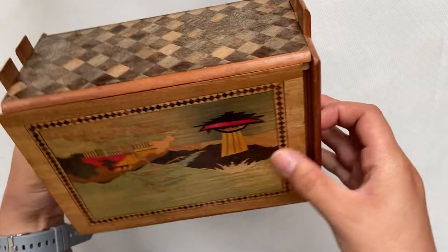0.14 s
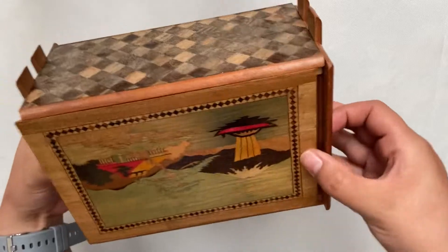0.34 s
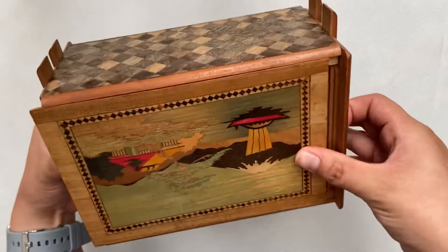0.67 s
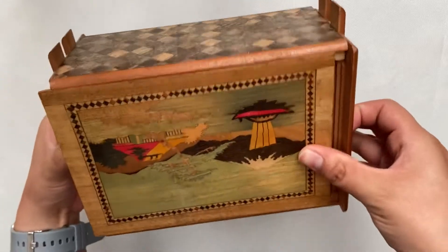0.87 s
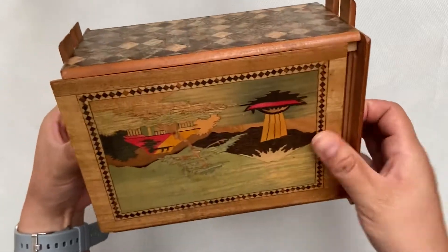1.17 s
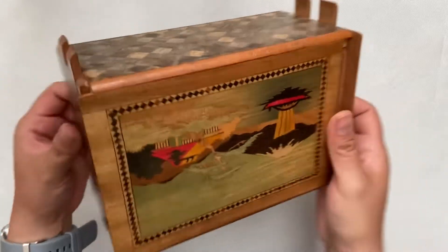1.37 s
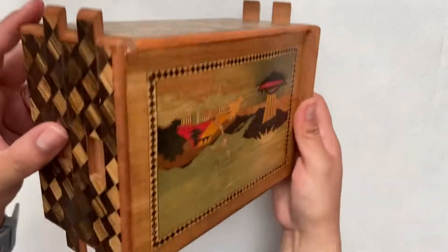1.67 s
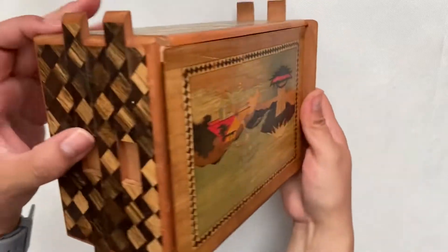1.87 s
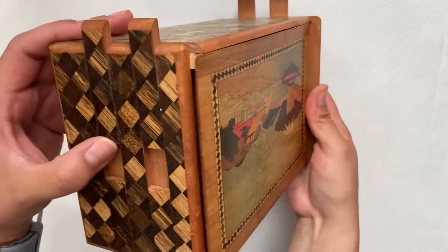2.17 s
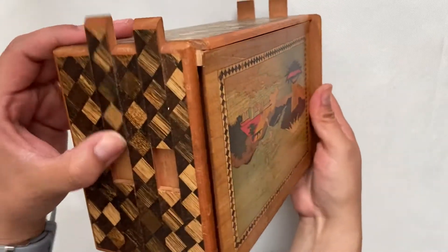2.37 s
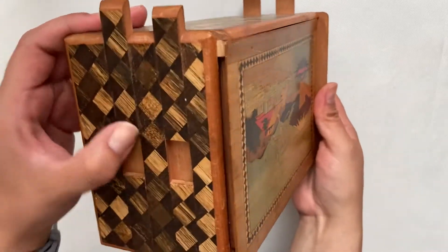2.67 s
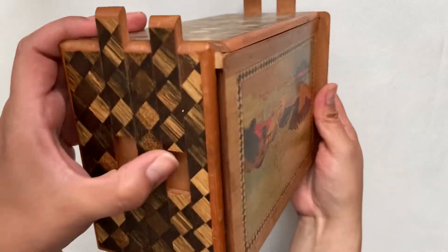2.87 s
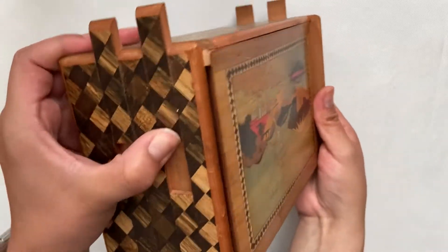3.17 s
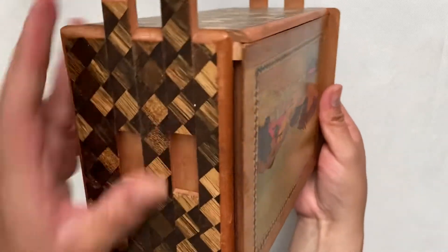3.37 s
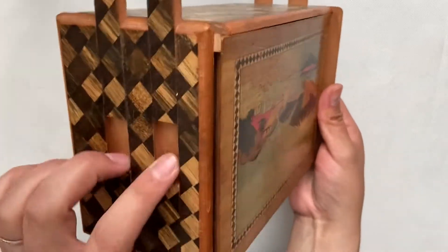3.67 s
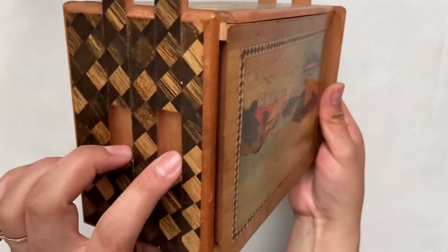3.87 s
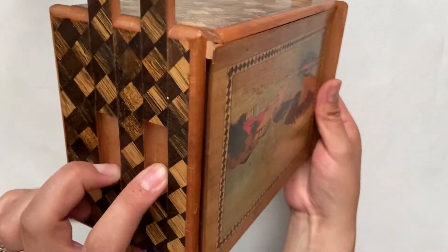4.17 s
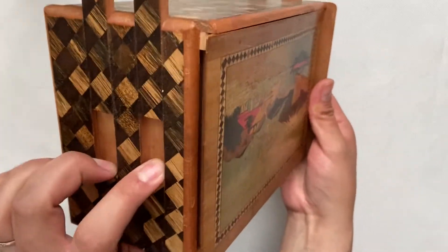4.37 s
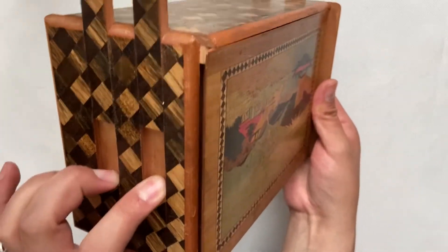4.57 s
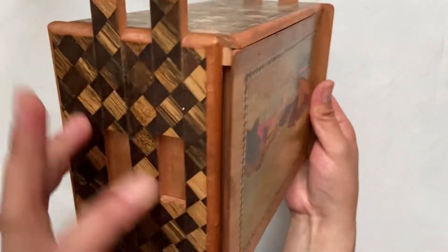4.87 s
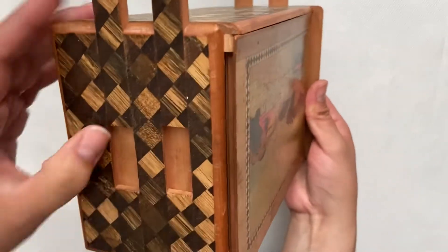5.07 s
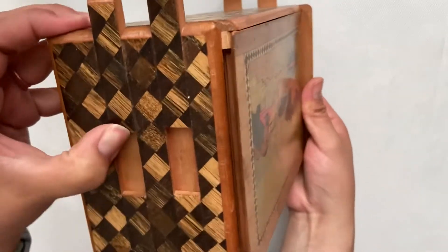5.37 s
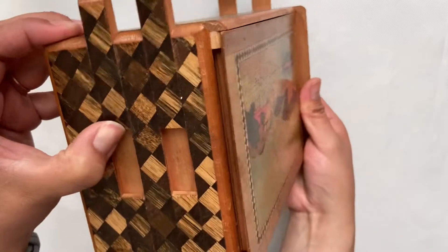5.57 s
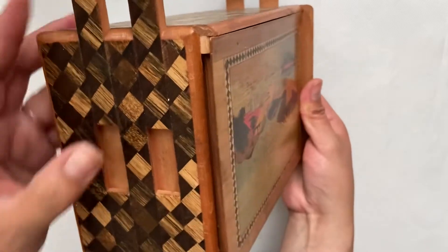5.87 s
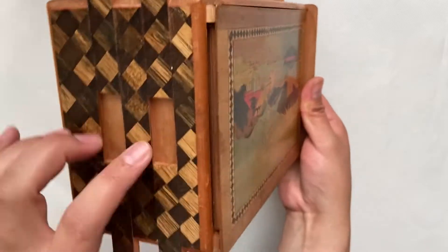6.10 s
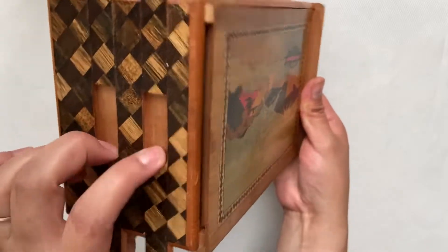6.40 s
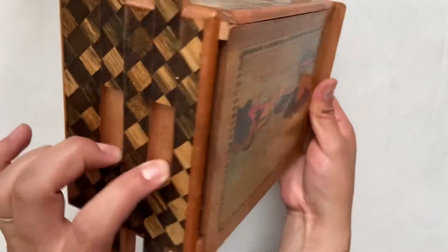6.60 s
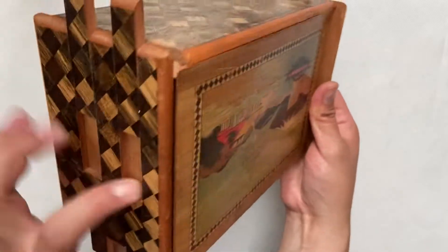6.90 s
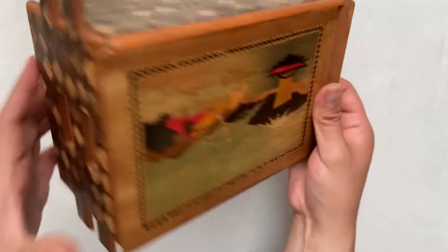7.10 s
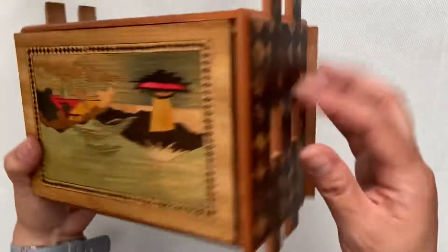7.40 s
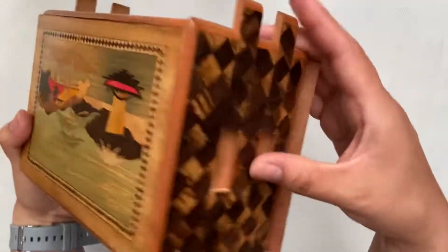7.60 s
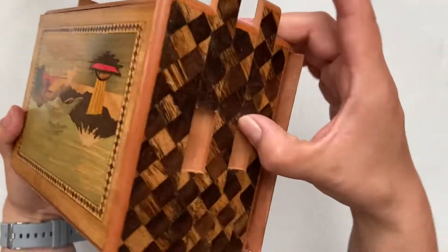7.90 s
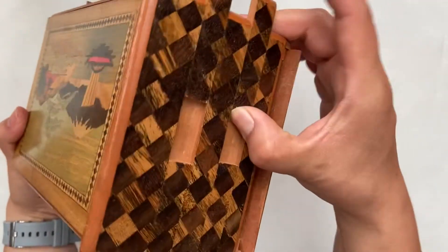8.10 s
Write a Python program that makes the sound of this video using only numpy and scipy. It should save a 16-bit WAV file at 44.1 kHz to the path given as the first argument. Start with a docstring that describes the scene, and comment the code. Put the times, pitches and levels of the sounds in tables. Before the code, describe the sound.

A low unsteady hum seeps through the walls while fingers slide the thin panels of a wooden box close to the microphone. The hardest hollow knock comes first, at half a second, with a short room echo. After it come small dry ticks, brief scratchy strokes, barely audible skin squeaks and soft palm thuds, continuing irregularly to the end.

```python
"""Machines hum through the walls all along, as wavering near-sine tones over shaped noise.
From the start, fingers and panels of a hollow wooden puzzle box rub in short gritty noise strokes, and
sliders knock on their stops as blows into ringing modes, hardest at half a second. From one second skin
squeaks faintly, as a roughened sine; from nearly two, a palm gives three soft low bumps.
A small hard room, made of decaying noise, answers the handling; two microphone ports hear it all."""
import sys
import numpy as np
from scipy import signal
from scipy.fft import rfft, irfft, next_fast_len
from scipy.io import wavfile
from scipy.ndimage import uniform_filter1d

SR = 44100
rng = np.random.default_rng(int(sys.argv[2]) if len(sys.argv) > 2 else 0)


def store_pcm(level_fs):
    """Save levels as 16-bit WAV."""
    pcm = np.round(np.clip(level_fs, -1, 1) * 32767).astype(np.int16)
    wavfile.write(sys.argv[1], SR, np.atleast_2d(pcm).T)


N = 363825

# knocks of sliders and fingers, before the part's facing and the panning:
# [t/s, panel level/dB, body level re panel/dB, crack level re panel/dB, ring f/Hz]
KNOCK_EVENTS = [(0.011, -59, -27, -20, 850), (0.299, -29.5, 2, 0.5, 830), (0.316, -27.5, -2, -13, 980),
                (0.478, -42, 0, -16, 870), (0.493, -38, -13, -0.5, 840), (0.517, -3, -20, -2.5, 909),
                (0.5207, -13, 12, 0.5, 990), (0.632, -6.5, -13.5, -29, 769), (0.637, -18, -36, 0, 713),
                (0.82, -27, -18, -12, 950), (0.852, -29.5, -8, -15, 883), (1.106, -42, -16.5, -12.5, 866),
                (1.149, -45.5, -12, -12.5, 855), (1.272, -30.5, -7, 1.5, 775),
                (1.408, -38.5, -38, -19, 786), (1.569, -42, -20.5, -4.5, 777),
                (1.783, -42, 4.5, -10.5, 1181), (2.331, -37, -19, -3, 1177), (2.587, -46, 6, 1, 1150),
                (2.664, -38.5, -27, -1.5, 1525), (2.989, -47.5, -27, 11, 1200), (3.032, -20, -25, 6, 1522),
                (3.911, -21.5, -11.5, 8.5, 1170), (4.198, -39.5, -4.5, 3.5, 1183),
                (4.311, -38, -33.5, -19.5, 1670), (4.351, -41, -17, -4.5, 1150), (4.376, -33, 6, 2, 1570),
                (4.399, -41.5, -26, -5, 1126), (4.518, -57.5, 0, 5, 1180), (4.584, -47.5, -17.5, -8, 1140),
                (4.701, -61.5, 17, 0, 1166), (4.731, -36, -27, 5, 2350), (5.037, -51, -21, -4, 1196),
                (5.074, -55, -21, 1, 1110), (5.249, -52.5, -22, -4, 1198), (5.345, -45.5, -37, -1, 1191),
                (5.365, -29, -15, -7.5, 1186), (5.413, -36.5, 2.5, -8.5, 1036),
                (5.69, -56.5, -20, -10, 1100), (5.761, -59.5, -16.5, 10, 1203),
                (5.813, -53, -21.5, 4, 1175), (5.934, -51.5, -17, 14, 1210), (6.107, -41.5, -11, -6, 1208),
                (6.311, -40.5, -10.5, 2, 2400), (6.378, -43.5, -17, 3.5, 1236),
                (6.419, -33.5, -14, 4.5, 1083), (6.527, -44, -15, -7.5, 1240),
                (6.794, -52.5, -16, -6.5, 1128), (6.828, -28.5, -13.5, -6.5, 2126),
                (7.119, -46, -19, -2.5, 957), (7.163, -41.5, -8, -0.5, 950), (7.25, -46, -24, -5, 797),
                (7.297, -38, -28.5, -11.5, 950), (7.368, -39, -19, 5, 957), (7.481, -51, -14, 7, 960),
                (7.513, -40, -11.5, 0, 980), (7.696, -42.5, -18, -13, 1144),
                (7.712, -42.5, -20.5, -16, 1067), (7.997, -43.5, 1.5, 0, 1150),
                (8.057, -43.5, -7.5, -3, 634), (8.187, -35.5, -22, 1.5, 1510), (8.195, -33, -28, -13, 984)]


def undb(db):
    """Decibels to amplitude."""
    return 10 ** (np.asarray(db) / 20)


def unit(x):
    """Scale a sound to an RMS of 1."""
    return x / np.sqrt(np.mean(x ** 2))


def decay(t, t60):
    """Exponential fade that has lost 60 dB at t60 seconds."""
    return np.exp(-np.log(1000) * t / t60)


def on_log(table, hz):
    """Read a (Hz, value) table on a log-frequency axis."""
    f, v = np.transpose(table)
    return np.interp(np.log(np.maximum(hz, 1)), np.log(f), v)


def curves(table):
    """Straight lines through a table's columns over time, sample by sample."""
    s, *columns = np.transpose(table)
    return [np.interp(np.arange(N) / SR, s, c) for c in columns]


def walk(rate, n=N):
    """Random levels, rate per second, slewed from one to the next; spread near 1."""
    k = max(int(SR / rate), 1)
    steps = np.repeat(rng.standard_normal(n // k + 1), k)
    return 1.2 * uniform_filter1d(steps, k)[:n]


def add(out, s, x):
    """Mix a sound in at time s."""
    i = int(s * SR)
    out[i:i + len(x)] += x[:N - i]


def spread(mid, side):
    """Left and right of a diffuse sound: alike in the bass, further apart in the middle."""
    # diffuse stereo width: [f/Hz, side filter level/dB]
    width = [(60, -10.5), (200, -9), (500, -3.5), (2500, -4), (6000, -3), (9000, -31), (16000, -19)]
    n = len(mid)
    side = irfft(rfft(side) * undb(on_log(width, np.fft.rfftfreq(n, 1 / SR))), n)
    return np.array([mid + side, mid - side])


def hum():
    """Near-sine machine tones, each fluttering a little, over the rumble and air noise of the house."""
    # strongest tone of a machine whose speed wavers: [t/s, f/Hz, level/dB]
    waver = [(0, 124.5, -48.5), (.9, 127.8, -51.5), (2.2, 126.9, -51.5), (3.4, 126.8, -55.5),
             (4.3, 125.6, -52), (5.4, 128.2, -52), (6.1, 127.9, -50.5), (6.9, 128.9, -53),
             (7.5, 126.1, -53.5), (8.25, 128.2, -50)]
    # further tones tied to its speed: [pitch ratio to the strongest tone, level/dB]
    waver_tones = [(0.396, -57), (.412, -62.5), (.62, -67.5)]
    # a separate tone that swells and sinks: [t/s, f/Hz, level/dB]
    swelling = [(0, 112, -50), (.9, 111.5, -60), (2.2, 115, -57.5), (3.4, 112.8, -54), (4.4, 114.1, -58.5),
                (5.3, 114.8, -50), (6.2, 114.9, -51), (6.8, 114.2, -66), (7.5, 111.4, -48.5),
                (8.25, 113.7, -50.5)]
    # a machine that speeds up: [t/s, low tone f/Hz, low tone level/dB, upper tone level/dB]
    speeding = [(0, 45.14, -54, -56), (1.5, 46, -58.5, -67), (2.6, 45.86, -52, -65),
                (3.9, 44.84, -58.5, -55.5), (5.1, 50.78, -51, -58), (5.6, 49.6, -50, -57),
                (8.25, 50.06, -57.5, -56)]
    # colour of the house air noise: [f/Hz, relative density level/dB]
    air_colour = [(20, -23), (40, -8), (60, -1.5), (120, 1), (170, -8), (300, -16), (500, -22.5),
                  (800, -37), (1100, -34), (2000, -42), (4500, -51.5), (8000, -51.5), (16000, -63)]
    upper_ratio, air_db = 1.7, -54.5

    def tone(hz, db, flutter_db):
        level = undb(db + flutter_db * walk(4.0))
        return np.sqrt(2) * level * np.sin(2 * np.pi * np.cumsum(hz) / SR)

    hz, db = curves(waver)
    low_hz, low_db, upper_db = curves(speeding)
    tones = tone(hz, db, 0.81) + tone(*curves(swelling), 0.66)
    tones = tones + sum(tone(ratio * hz, level, 0.45) for ratio, level in waver_tones)
    tones = tones + tone(low_hz, low_db, 0.73) + tone(upper_ratio * low_hz, upper_db, 0.39)
    colour = undb(on_log(air_colour, np.fft.rfftfreq(N, 1 / SR)))
    air = irfft(rfft(rng.standard_normal((2, N))) * colour, N)
    lean = undb([[.4], [-.4]])  # slightly louder on the left
    return (tones + spread(*unit(air)) * undb(air_db)) * lean


def touched(s):
    """Ring and crack pitch of the part handled at time s, and how much it faces the microphone."""
    # the part under the working hand changes as the box turns, pitches before scatter:
    # [from t/s, ring when rubbed f/Hz, crack centre f/Hz, facing the microphone level/dB]
    panels = [(0, 871, 2106, -1.5), (.6, 745.4, 2120, -1), (1.65, 1233, 2330, 3), (3.0, 1290, 5580, 5.5),
              (3.1, 1216, 2350, -4.5), (3.58, 1560, 2868, 4.5), (3.8, 1182, 2566, 3), (7.0, 890, 2847, -2),
              (7.6, 1128, 1877, 1.5)]
    scatter = .03  # octaves: no two touches land on the same spot
    row = np.searchsorted(np.transpose(panels)[0], s, side="right") - 1
    _, ring_hz, crack_hz, facing_db = panels[max(row, 0)]
    ring_hz, crack_hz = np.array([ring_hz, crack_hz]) * 2 ** (scatter * rng.standard_normal(2))
    return ring_hz, crack_hz, facing_db


def box(force, ring_hz, crack_hz, focus_db, tilt_db=0, damp=1.0):
    """Body, panel, veneer and its even colour answer a force; the touch favours ring_hz and crack_hz."""
    # modes of the box before grip and chance: [f/Hz, level/dB, t60/s]
    modes = [(262.8, -1, 0.033), (295, 6.5, 0.03), (372, 5, 0.027), (434, 1.5, 0.063), (480, -2.5, 0.039),
             (610, -6, 0.059), (813, 4, 0.022), (1029, -3, 0.026), (1165.6, 0.5, 0.023), (1332, 3.5, 0.011),
             (1502, -3, 0.017), (1650, -4.5, 0.0094), (1830, -1, 0.0089)]
    # dense short-lived treble of thin veneer: [f/Hz, level/dB]
    veneer_colour = [(700, -28), (1300, -5.5), (2200, 4), (4000, 3), (7500, -3), (9500, -6.5),
                     (12500, -13.5), (14500, -21.5), (16500, -37.5)]
    body_top_hz = 580
    below_slope, above_slope = 24, 15.5  # dB per octave: modes fall off away from the favoured ring
    rise_cycles = .6  # a panel's ring swells over its first cycle
    slider_db, slider_t60 = -7.5, 0.031  # the thin slider's own ring (s), within the crack
    tilt_corner_hz = 5240  # tilt_db is a slope per octave above this

    hz, db, t60 = np.transpose(modes)[:, :, None]
    level_chance, pitch_chance = rng.standard_normal((2, len(modes), 1))
    t = np.arange(4096) / SR
    is_panel = hz > body_top_hz
    is_body = hz[:, 0] < body_top_hz
    away = np.log2(hz / ring_hz)
    fall_db = np.maximum(above_slope * away, -below_slope * away)
    db = db + 2.0 * level_chance - fall_db * is_panel
    # the grip bends the nearest mode onto the ring, and the other panel modes along with it
    nearest = away.flat[abs(away).argmin()]
    hz = hz * np.where(is_panel, 2 ** -nearest, 1)
    is_panel = hz > body_top_hz
    hz = hz * (1 + .012 * pitch_chance)
    is_panel = hz > body_top_hz
    rings = undb(db) * decay(t * damp, t60) * np.sin(2 * np.pi * hz * t)
    rings = rings * (1 - is_panel * np.exp(-t * hz / rise_cycles))
    rings = uniform_filter1d(rings, size=9)  # wood on wood: the contact lasts a fifth of a millisecond

    f = np.fft.rfftfreq(len(t), 1 / SR)
    octaves_off = np.log2(np.maximum(f, 1) / crack_hz)
    colour_db = on_log(veneer_colour, f) + focus_db * np.exp(-(octaves_off / 0.26) ** 2)
    colour_db = colour_db + tilt_db * np.log2(np.maximum(f / tilt_corner_hz, 1))
    veneer = rng.standard_normal(len(t)) * decay(t, .012)
    veneer = irfft(rfft(veneer) * undb(colour_db))[:len(t) // 2]
    slider = decay(t, slider_t60) * np.sin(2 * np.pi * crack_hz * t)
    veneer = veneer + undb(slider_db) * slider[:len(veneer)]
    even = np.roll(irfft(undb(colour_db)), 128)[:256]  # the same colour without noise or ring
    answers = rings[is_body].sum(axis=0), rings[~is_body].sum(axis=0), veneer, even
    return [signal.fftconvolve(force, answer) for answer in answers]


def rubs():
    """Skin and veneer stick and slip: gritty noise that stutters, heard through hand-damped modes."""
    # rubbing strokes, before the panning: [start t/s, length/s, hiss level/dB, panel ring level re hiss/dB]
    strokes = [(0, 0.017, -51.5, 2), (0.026, 0.11, -68, 3), (0.149, 0.048, -63, 1.5),
               (1.081, 0.096, -71, -6), (1.198, 0.14, -64, 2.5), (1.396, 0.086, -60.5, 9.5),
               (1.494, 0.061, -62, -16), (1.704, 0.078, -56, -0.5), (1.773, 0.38, -75.5, 3.5),
               (2.284, 0.1, -60.5, -2), (2.418, 0.031, -68.5, -5), (2.547, 0.053, -64.5, -5),
               (2.795, 0.33, -73.5, 5), (2.984, 0.079, -52, 0.5), (3.221, 0.048, -56.5, -2),
               (3.243, 0.11, -58, -22.5), (3.473, 0.15, -70.5, 2), (3.599, 0.17, -80.5, 6),
               (3.882, 0.035, -47, -0.5), (4.221, 0.039, -60, -6), (4.36, 0.048, -62, 7),
               (4.653, 0.091, -68.5, -1.5), (4.725, 0.048, -52.5, 3), (4.842, 0.053, -62.5, 0.5),
               (5.035, 0.056, -69.5, -2.5), (5.361, 0.068, -56, 1), (5.759, 0.081, -66, -4.5),
               (5.937, 0.045, -60.5, -2.5), (6.094, 0.075, -61, 4), (6.243, 0.062, -70, -12),
               (6.31, 0.1, -69.5, 8.5), (6.422, 0.097, -68, 5), (6.83, 0.053, -57.5, -3),
               (7.075, 0.028, -67.5, -8.5), (7.11, 0.11, -61.5, 0.5), (7.253, 0.17, -63.5, 1.5),
               (7.476, 0.16, -66.5, 2.5), (7.678, 0.057, -69.5, 12), (7.796, 0.18, -78, 8)]
    knocked_s = .012  # a stroke this close to a knock was set off by it
    fade_db = -5  # such a stroke fades as the hand slows
    swell_db, peak_at = 12, 0.6  # a free stroke swells to a peak at this share of its length
    hiss_centre_hz, hiss_scatter = 4956, 0.37  # scatter in octaves
    # tiny ticks where skin or slider catches on the inlay, each ringing panel or slider for catch_s
    catch_per_s, catch_db, catch_spread_db, catch_s = 130, 3, 8, .003

    out = np.zeros(N)
    for s, length, db, panel_db in strokes:
        n = int(max(length, .012) * SR)
        stutter_db = 4.2 * np.clip(walk(60, n), -2.2, 1.8)
        along = np.linspace(0, 1, n)
        knocked = abs(np.transpose(KNOCK_EVENTS)[0] - s).min() < knocked_s
        below_peak = np.maximum(1 - along / peak_at, .5 * (along - peak_at) / (1 - peak_at))
        course_db = along * fade_db if knocked else -swell_db * below_peak
        stroke = undb(course_db) * signal.windows.tukey(n, .2)
        grit_db = 2.6 * rng.exponential(size=n)
        force = rng.standard_normal(n) * undb(grit_db + stutter_db) * stroke

        ring_hz = touched(s)[0]
        hiss_hz = hiss_centre_hz * 2 ** (hiss_scatter * rng.standard_normal())
        parts = box(np.pad(force, (0, 1500)), ring_hz, hiss_hz, focus_db=2.5, tilt_db=9.5)
        body, panel, veneer, hiss = (unit(x[:n + 1500]) for x in parts)
        hiss = unit(hiss + undb(-2.5) * veneer)
        ring = panel + undb(-11.5) * body
        add(out, s, undb(db) * (hiss + undb(panel_db) * ring))

        t = np.arange(1024) / SR
        for at, size, pitch in rng.random((rng.poisson(catch_per_s * length), 3)):
            tick_hz = touched(s)[int(2 * pitch)]  # ring or crack pitch, evenly likely
            tick = np.exp(-t / catch_s) * np.sin(2 * np.pi * tick_hz * t)
            level = undb(db + catch_db - catch_spread_db * size) * np.sqrt(unit(stroke)[int(at * n)])
            add(out, s + at * length, level * tick)
    return out


def knocks():
    """Each knock is a blow with a faint short rattle; rows: towards the microphone, into the room."""
    # heavier blows press longer and are duller: dB per octave for each dB of strength, flat at dull_from_db
    dull_from_db, dull_per_db = -18.5, 0.3346
    tick_db = -18  # the bright first touch re the panel, before the dullness of heavy blows
    ring_room_db = -1  # a panel beams its ring forwards, so the room hears less of it

    out = np.zeros((2, N))
    t = np.arange(SR // 100) / SR
    for s, db, body_db, crack_db, ring_hz in KNOCK_EVENTS:
        _, crack_hz, facing_db = touched(s)
        tilt_db = dull_per_db * (dull_from_db - db)
        force = 0.18 * rng.standard_normal(len(t)) * np.exp(-t / 0.0021)
        force[0] = 1
        parts = box(force, ring_hz, crack_hz, focus_db=7.5, tilt_db=tilt_db, damp=0.95)
        body, panel, crack, _ = (x / abs(x).max() for x in parts)
        # summed over all directions the crack is smooth in colour
        even = box(force[:1], ring_hz, crack_hz, focus_db=2.5, tilt_db=tilt_db)[3]
        even = even * np.linalg.norm(crack) / np.linalg.norm(even)

        tick = np.diff(even, n=2)
        tick_level = undb(db + facing_db + tick_db + 2 * min(tilt_db, 0))
        add(out[0], s - .003, tick_level * tick / abs(tick).max())
        for row, treble, level_db in zip(out, (crack, even), (db + facing_db, db + ring_room_db)):
            add(row, s - .0003, undb(level_db) * panel + undb(db + body_db) * body)
            add(row, s - .0003, undb(max(level_db, db) + crack_db) * treble)
    return out


def squeaks():
    """Skin on lacquer: an unsteady whistle whose pitch follows the speed of the hand."""
    # faint squeaks, before the panning: [start t/s, length/s, pitch at the ends f/Hz, level/dB]
    whistles = [(1.083, 0.089, 6230, -71), (1.757, 0.18, 4990, -70), (1.886, 0.23, 2950, -72),
                (7.55, 0.093, 2960, -73), (7.795, 0.2, 3050, -72.5)]
    # shares of the pitch: breathy width; rise at mid-stroke, where the hand is fastest
    breath, arch = 0.072, 0.016
    out = np.zeros(N)
    for s, length, hz, db in whistles:
        n = int(length * SR)
        speed = np.sin(np.linspace(0, np.pi, n))
        carrier = np.sin(2 * np.pi * np.cumsum(hz * (1 + arch * speed)) / SR)
        whistle = unit(walk(2 * breath * hz, n) * carrier)
        add(out, s, undb(db) * np.sqrt(speed) * whistle)
    return out


def bumps():
    """A palm's soft contact swells over about a cycle, then rings low and short."""
    # palm bumps: [t/s, level/dB, pitch f/Hz]
    palm_hits = [(1.8, -21, 117.7), (2.422, -37, 125.8), (6.119, -29, 126.5)]
    out = np.zeros(N)
    t = np.arange(SR // 6) / SR
    push = (t / 0.0086) ** 4 * np.exp(4 - 4 * t / 0.0083)
    ring = 0.097 * (1 - np.exp(-t / 0.016)) * np.exp(-t / 0.073)
    for s, db, hz in palm_hits:
        add(out, s - .007, undb(db) * (push + ring) * np.sin(2 * np.pi * hz * t))
    return out


def room(dry):
    """Quick echoes off hands and table, then a dense tail, band by band, that builds up."""
    # reverberation time: [f/Hz, t60/s]
    room_decay = [(200, 0.3), (1000, 0.53), (5000, 0.53), (14000, 0.18)]
    tail_db, near_db = -11, -3.5
    n = int(1.2 * SR)
    t, f = np.arange(n) / SR, np.fft.rfftfreq(n, 1 / SR)
    tail = 0
    for hz in 150 * 2. ** np.arange(8):  # overlapping octave bands
        band = np.clip(1 - abs(np.log2(np.maximum(f, 1) / hz)), 0, 1) ** .5
        noise = irfft(rfft(rng.standard_normal((2, n))) * band, n)
        tail = tail + noise * decay(t, on_log(room_decay, hz))
    tail = tail * np.clip((t - .003) / 0.0018, 0, 1)
    near = rng.standard_normal(n) * np.exp(-t / 0.001)
    near = near - uniform_filter1d(near, size=36)  # hands are too small to reflect bass
    echoes = undb(tail_db) * spread(*tail) / np.linalg.norm(tail[0])
    # the quick echoes come from the sides and reach the ports with opposite sign
    echoes = echoes + undb(near_db) * spread(0 * near, near) / np.linalg.norm(near)
    return signal.fftconvolve(dry[None], echoes[:, :SR], axes=1)[:, :N]


def scene():
    """Sum the hum, the panned handling of the box, the centred palm and the room's answer."""
    # where the working hand is: [t/s, left minus right level/dB]
    hand_pan = [(0, -2), (2, -1), (3, -5), (5, -1.5), (8.25, -2)]
    # a small box radiates little below its lowest mode
    highpass = signal.butter(3, 190, "high", fs=SR, output="sos")
    direct, radiated = signal.sosfilt(highpass, rubs() + knocks() + squeaks())
    pan_db, = curves(hand_pan)
    panned = direct * undb([pan_db / 2, -pan_db / 2])
    palm = bumps()
    return hum() + panned + palm + room(radiated + palm)


def record(dry):
    """Two ports hear the treble with a growing phase shift; loud peaks are rounded, the top is cut."""
    # phase between the ports: [f/Hz, lead of the left port/rad]
    port_lead = [(0, 0), (2500, -.5), (6500, -.3), (8000, 2.5), (9300, 3.14), (10300, 3.7), (12000, 6.2),
                 (15000, 9.4)]
    n = next_fast_len(N + 2048)
    hz, lead = np.transpose(port_lead)
    lead = np.interp(np.fft.rfftfreq(n, 1 / SR), hz, lead)
    shift = np.exp(.5j * lead * np.array([[1], [-1]]))
    ports = irfft(rfft(dry, n) * shift, n)[:, :N]
    lowpass = signal.ellip(10, .2, 80, 16400, fs=SR, output="sos")
    return signal.sosfilt(lowpass, np.tanh(ports))


dry = scene()
out = record(dry)
store_pcm(out)
```